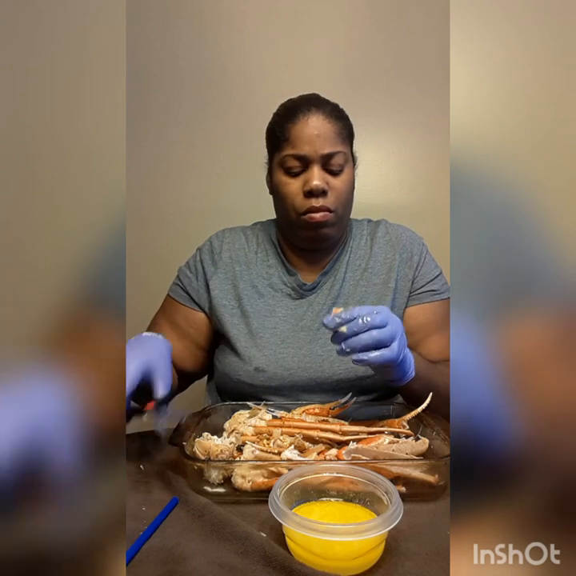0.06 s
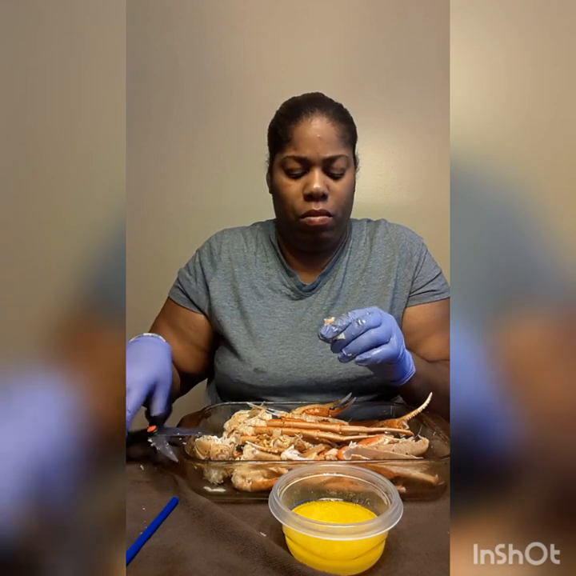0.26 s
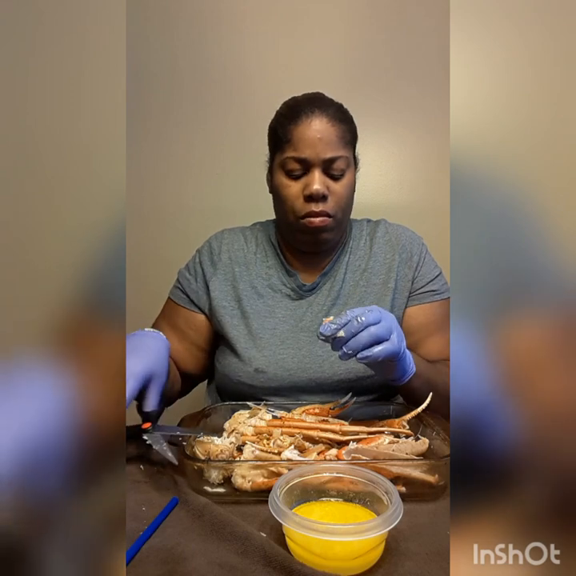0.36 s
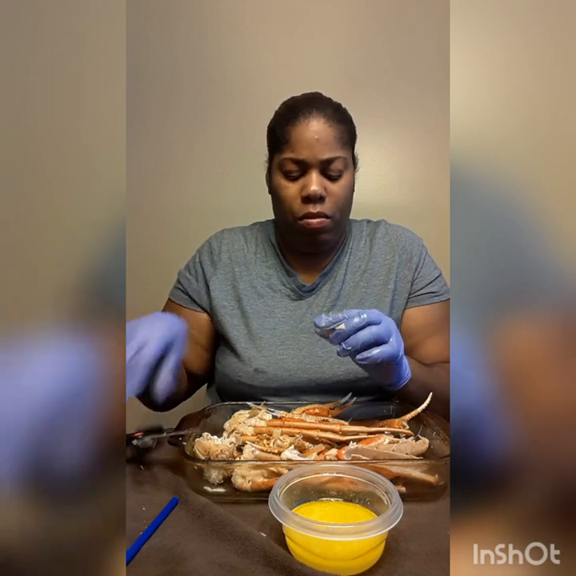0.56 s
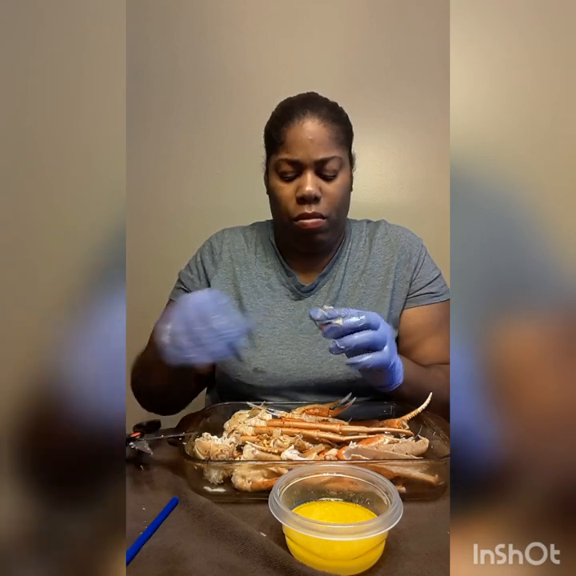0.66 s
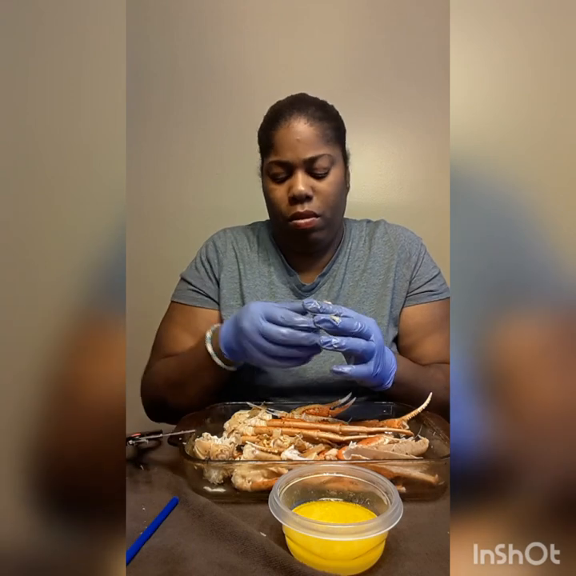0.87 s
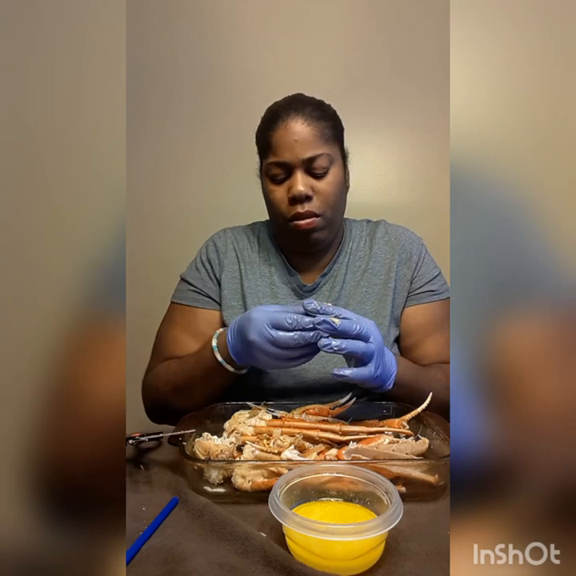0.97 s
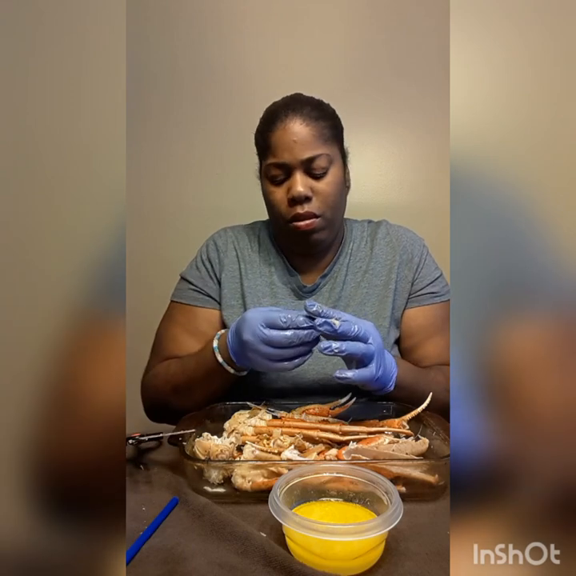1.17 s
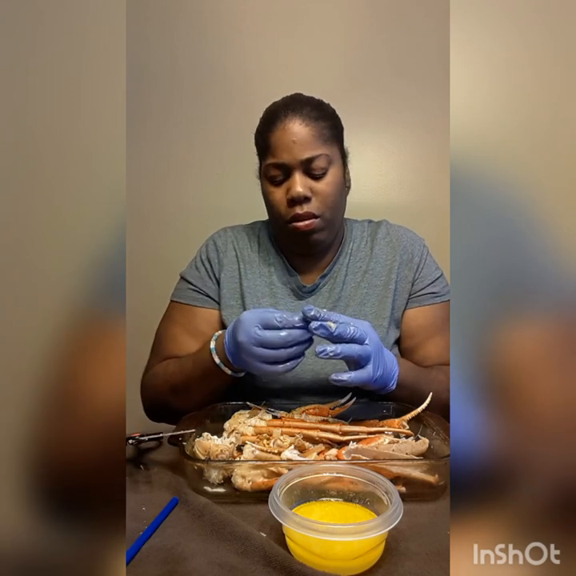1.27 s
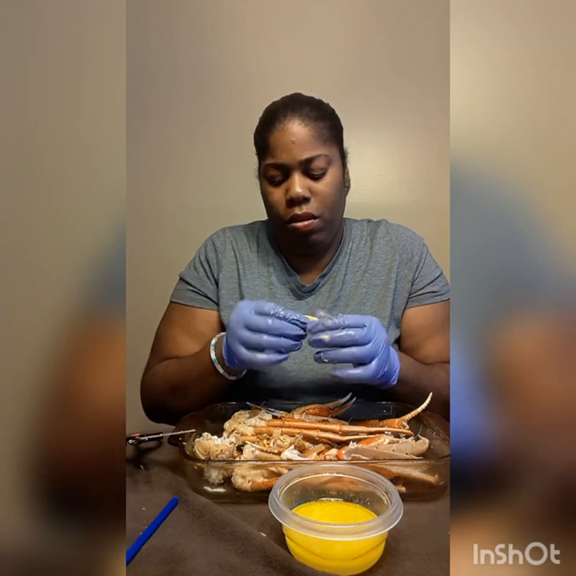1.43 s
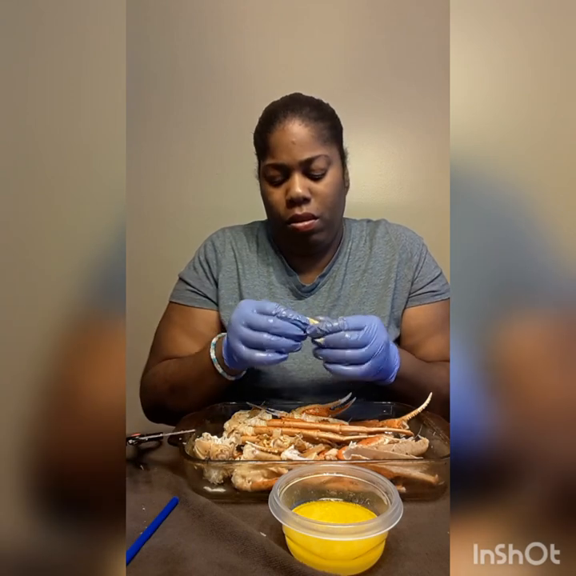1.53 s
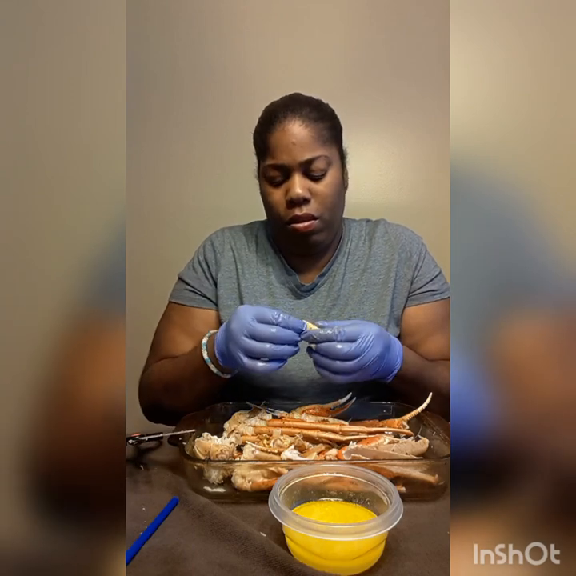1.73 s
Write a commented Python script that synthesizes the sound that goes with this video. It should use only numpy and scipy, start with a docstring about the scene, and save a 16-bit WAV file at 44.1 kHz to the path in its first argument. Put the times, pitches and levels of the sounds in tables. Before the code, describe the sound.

Steel kitchen scissors are put down against a glass baking dish: two quick clinks with small bounces, a short pause, then a dull and a brighter clink; small room, low ventilation hum, close phone microphone.

```python
"""Scissors set down against a glass dish

Steel kitchen scissors touch a glass baking dish on a table, bounce, and after a pause settle with a dull
then a bright clink: fading sine waves for the ring, bursts of noise for the crack and clash.
A small room answers with fading noise, over a low ventilation hum of coloured noise.
Later, gloved fingers give a faint squeak (a rough falling tone) and tiny ticks (short noise bursts)."""
import sys
import numpy as np
from scipy import signal
from scipy.fft import rfft, irfft, next_fast_len
from scipy.io import wavfile
from scipy.ndimage import uniform_filter1d

SR = 44100
rng = np.random.default_rng(int(sys.argv[2]) if len(sys.argv) > 2 else 0)


def output_pcm(signal):
    """Save a mono or channel-first signal as 16-bit PCM at the path in sys.argv[1].

    Samples are clipped to [-1, 1] before scaling.
    """
    pcm = np.clip(np.atleast_2d(signal).T, -1, 1) * 32767
    wavfile.write(sys.argv[1], SR, np.round(pcm).astype(np.int16))


N = 79380  # length in samples (1.8 s)


def amp(db):
    """Turn decibels into a gain."""
    return 10 ** (np.asarray(db) / 20)


def unit(x):
    """Scale a sound to an average (rms) size of 1."""
    return x / np.sqrt(np.mean(x ** 2) + 1e-20)


def along(points, hz):
    """Read a curve of (frequency, value) points at any frequency, on a log frequency axis."""
    f, v = np.transpose(points)
    return np.interp(np.log(hz + 1), np.log(f + 1), v)


def filtered(x, response):
    """Make each frequency of a sound louder or softer, as the response function says."""
    padded = next_fast_len(x.shape[-1] + 8192)
    gain = response(np.fft.rfftfreq(padded, 1 / SR))
    return irfft(rfft(x, padded) * gain, padded)[..., :x.shape[-1]]


# How much the treble differs between left and right in the hum and room echo, before extra_db is added:
# (frequency [Hz], level [dB])
WIDTH = [(2500, -57), (4400, -8.5), (7000, -6.5), (9500, -2), (15000, 1.5)]


def spread(pair, extra_db):
    """Make stereo from two unrelated sounds: the second, added left and taken away right, widens the treble."""
    middle = pair[0]
    side = filtered(pair[1], lambda hz: amp(along(WIDTH, hz) + extra_db))
    return np.array([middle + side, middle - side])


# Colour of the ventilation noise, relative levels: (frequency [Hz], level [dB])
HUM = [(15, -54), (25, -24.5), (32, -24), (130, -3.5), (212, -6.5), (363, -5.5), (531, -12.5), (607, -23),
       (887, -21.5), (5730, -39), (11900, -39.5), (16000, -39)]
HUM_DB = -59  # loudness of the hum before it is widened


def hum(patchy_db):
    """Ventilation rumble and hiss: coloured noise whose level drifts a little over time and frequency."""
    noise = signal.stft(rng.standard_normal((2, N)), nperseg=512)[2]
    patches = rng.standard_normal(noise.shape[1:])
    patches = uniform_filter1d(patches, size=8, axis=0)  # smooth over frequency
    patches = uniform_filter1d(patches, size=6, axis=1)  # smooth over time
    pair = signal.istft(noise * amp(patchy_db * unit(patches)), nperseg=512)[1][:, :N]
    pair = filtered(pair, lambda hz: amp(along(HUM, hz)))
    return amp(HUM_DB) * spread(pair / np.std(pair[0]), extra_db=-2)


# Colour of crack and clash, one list for each spot, relative levels: (frequency [Hz], level [dB])
CLASH = [
    [(180, -49.5), (300, -22.5), (1450, 1), (1770, -22.5), (2200, -11.5), (4570, -29.5), (7410, -26.5),
     (15900, -17)],
    [(180, -36), (300, -6.5), (883, -30.5), (1450, 5), (1630, -21), (4500, -18.5), (6590, -19.5),
     (15900, -36)],
    [(180, -52), (300, -25), (913, -22), (1150, -5), (1690, -35.5), (4500, -41), (6170, -44), (15900, -50)],
    [(180, -44), (300, -19), (1480, -6), (1660, -16.5), (3810, -23.5), (5140, -26.5), (7660, -17),
     (15900, -37)],
]
CRACK_T60_S = 0.0092  # the crack fades by 60 dB in this time


def crack_and_clash(k, crack_db, clash_db, clash_t60, t):
    """The edge gives a burst of coloured noise with a very short fade (crack) and a longer one (clash)."""
    noise = unit(filtered(rng.standard_normal(len(t)), lambda hz: amp(along(CLASH[k], hz))))
    crack_fade = amp(crack_db - 60 * t / CRACK_T60_S)
    clash_fade = amp(clash_db - 60 * t / clash_t60)
    return noise * (crack_fade + clash_fade)


# Loose contact makes each tone waver: strength as a share, and changes per second at 1 kHz
WAVER, WAVER_RATE = 0.3, 35
RISE_S, SCATTER_DB = 0.0012, 2.45  # soft start; random spread of each tone's level


def ring(hz, t60, db, t):
    """Add up fading sines that waver in size and phase, each a little stronger or weaker every time."""
    hz, t60, db = hz[:, None], t60[:, None], db[:, None]
    db = db + SCATTER_DB * rng.standard_normal((len(hz), 1))
    place = t * WAVER_RATE * np.sqrt(hz / 1000)  # high tones waver faster
    knots = rng.standard_normal((2, len(hz), 128))
    knots = knots - knots[:, :, :1]  # every waver starts from zero
    a, b = [np.array([np.interp(p, np.arange(128), row) for p, row in zip(place, part)]) for part in knots]
    phase = 2 * np.pi * hz * t
    wave = (1 + WAVER * a) * np.sin(phase) + WAVER * b * np.cos(phase)
    fade = amp(db - 60 * t / t60)
    return np.sum(fade * wave, axis=0) * (1 - np.exp(-t / RISE_S))


# Tones of the glass dish, then of the steel blades, with a basic time to fade by 60 dB:
# (frequency [Hz], fade time [s], relative level at each of four spots: four columns [dB])
DISH = [(484.8, 0.098, -36, -38, -44.5, -36.5), (603, 0.107, -45, -56, -53, -44),
        (759, 0.06, -29.5, -60, -74, -67), (820, 0.03, -21, -50, -50, -35.5),
        (1026, 0.073, -31.5, -37.5, -44, -30), (1147, 0.058, -16.5, -59, -20.5, -42.5),
        (1311, 0.054, -55.5, -32.5, -35.5, -54), (1473, 0.11, -23, -38.5, -31.5, -32.5),
        (2054, 0.088, -26, -59, -47, -32), (2235.5, 0.05, -24, -27.5, -39, -30),
        (2600, 0.15, -59, -49.5, -55.5, -55.5), (2790, 0.053, -35.5, -42, -67, -42),
        (3150, 0.13, -39.5, -41.5, -66, -48), (3762, 0.061, -35, -44.5, -55, -37),
        (4066, 0.094, -59, -57, -60.5, -42)]
STEEL = [(4850, 0.12, -69, -48, -58, -76), (5580, 0.067, -36, -41.5, -76, -35),
         (5950, 0.15, -52.5, -43.5, -59, -50), (6055, 0.11, -46.5, -45, -54, -39.5),
         (6435, 0.096, -56.5, -37.5, -57, -38), (6660, 0.091, -59.5, -33.5, -63, -37),
         (6795, 0.25, -42, -42, -56.5, -53), (7350, 0.04, -25.5, -32, -53, -28.5),
         (7460, 0.47, -36, -61, -74, -55), (7900, 0.075, -37, -51, -56, -27.5),
         (9150, 0.13, -65, -76.5, -67, -52), (10770, 0.035, -51.5, -43, -57.5, -33.5)]


def dish_and_blades(k, level_db, length_share, t):
    """Glass and steel ring together; the spot touched sets how strongly each tone sounds and how long."""
    modes = np.array(DISH + STEEL, float)
    return ring(modes[:, 0], length_share * modes[:, 1], modes[:, 2 + k] + level_db, t)


# Low tones of the table top: (frequency [Hz], time to fade by 60 dB [s], relative level [dB])
TABLE = [(62.5, .2, -18), (128, 0.14, 0), (169, 0.11, 6), (300.6, .1, -10), (335, 0.12, -11.5)]


def table_thud(level_db, t):
    """The table top answers each contact with a few low, fading tones."""
    modes = np.array(TABLE, float)
    return ring(modes[:, 0], modes[:, 1], modes[:, 2] + level_db, t)


# Contacts, one list for each of the four spots touched, relative levels:
# (time [s], ring [dB], crack [dB], clash [dB], table thud [dB])
CONTACTS = [
    [(.2102, -39, -33.5, -55, -75.5), (.2121, -1, -22.5, -27.5, -40), (.2155, -17.5, -32, -35, -47)],
    [(.2608, -2, -25.5, -31, -44), (.274, -6.5, -36.5, -41, -64), (.290, -8.5, -43.5, -49.5, -57)],
    [(.5520, -7.5, -26.5, -30.5, -44), (.5548, 1, -49, -39, -48), (.5755, -11.5, -48, -38, -39.5),
     (.597, -11.5, -50, -43, -49.5)],
    [(.6275, -2.5, -32, -33.5, -41.5), (.637, -7.5, -42, -38.5, -41.5)],
]
# How the hand damps each spot more or less: (clash time to fade by 60 dB [s], share of the basic ring time [-])
GRIP = [(.07, 0.85), (0.089, 1.01), (0.18, 1.87), (0.084, 1.03)]


def spot(k):
    """All contacts at one spot: the edge cracks and clashes, dish and blades ring, the table thuds."""
    out = np.zeros(N + SR)
    t = np.arange(SR // 3) / SR
    clash_t60, length_share = GRIP[k]
    for start_s, ring_db, crack_db, clash_db, thud_db in CONTACTS[k]:
        hit = crack_and_clash(k, crack_db, clash_db, clash_t60, t)
        hit += dish_and_blades(k, ring_db, length_share, t)
        hit += table_thud(thud_db, t)
        out[round(start_s * SR):][:len(t)] += hit
    return out[:N]


# Room echo: (frequency [Hz], time to fade by 60 dB [s])
ROOM = [(150, .5), (500, 0.57), (1500, 0.56), (4000, 0.65), (8000, 0.45), (15000, 0.32)]
ROOM_DB, ROOM_WIDTH_DB = -6.5, -5.5  # echo level before widening; change to the width curve
ROOM_DELAY_S, ROOM_RISE_S = 0.004, 0.0033


def room(x):
    """The small room answers with a blur of echoes that builds up; each frequency dies at its own speed."""
    hz, t, noise = signal.stft(rng.standard_normal((2, SR)), SR, nperseg=256)
    fade = amp(-60 * t / along(ROOM, hz)[:, None])
    tail = signal.istft(noise * fade, SR, nperseg=256)[1]
    tail = tail * (1 - np.exp(-np.arange(tail.shape[1]) / SR / ROOM_RISE_S))
    tail = tail / np.linalg.norm(tail[0])
    late = np.pad(x, (round(ROOM_DELAY_S * SR), 0))[None]
    wet = signal.fftconvolve(late, tail, axes=1)[:, :N]
    return amp(ROOM_DB) * spread(wet, ROOM_WIDTH_DB)


# Finger ticks: (time [s], level before filtering [dB], centre frequency [Hz])
TICKS = [(1.467, -65.5, 4780), (1.5725, -55, 4760), (1.582, -54, 2800), (1.615, -62, 7600)]


def ticks():
    """Each tiny tick is a fast-fading noise burst, filtered to a broad band around its centre."""
    t = np.arange(N) / SR
    out = np.zeros(N)
    for start_s, db, centre in TICKS:
        after = np.maximum(t - start_s, 0)
        burst = rng.standard_normal(N) * (t >= start_s) * amp(-60 * after / 0.017)  # 60 dB in 17 ms

        def band(hz):
            return 1j * hz * 0.52 * centre / (centre ** 2 - hz ** 2 + 1j * hz * 0.51 * centre)
        out += amp(db) * filtered(burst, band)
    return out


SQUEAK_S, SQUEAK_LEN_S, SQUEAK_DB = 1.5, 0.088, -77  # start [s]; length [s]; level before shaping
SQUEAK_HZ, SQUEAK_FALL_HZ, SQUEAK_WIDE_HZ = 11150, 450, 600  # starting pitch; fall; blur to each side


def squeak():
    """Rubber squeaks thinly: a falling tone made rough by slower noise that multiplies it."""
    t = np.arange(N) / SR
    progress = np.clip((t - SQUEAK_S) / SQUEAK_LEN_S, 0, 1)
    swell = np.sqrt(np.abs(np.sin(np.pi * progress))) * (progress < 1)
    rough = unit(filtered(rng.standard_normal(N), lambda hz: np.exp(-(hz / SQUEAK_WIDE_HZ) ** 2)))
    phase = 2 * np.pi * np.cumsum(SQUEAK_HZ - SQUEAK_FALL_HZ * progress) / SR
    return amp(SQUEAK_DB) * swell * rough * np.sin(phase)


def scene():
    """Put the centred clinks with their room echo, the hum and the fingers together."""
    clinks = [spot(k) for k in range(len(CONTACTS))]
    with_room = sum(c + room(c) for c in clinks)
    return with_room + hum(patchy_db=1.0) + squeak() + ticks()


MIC_LOW_HZ, TOP_HZ = 65, 15900  # bass thins out around the first; nothing passes from the second up
OFFSET = -0.0005  # constant shift away from zero


def record(dry):
    """A phone thins the lowest bass, sits slightly off zero and keeps nothing above its band limit."""
    thin = filtered(dry, lambda hz: (1j * hz / (MIC_LOW_HZ + 1j * hz)) ** 2)
    return filtered(thin, lambda hz: hz < TOP_HZ) + OFFSET


dry = scene()
out = record(dry)
output_pcm(out)
```